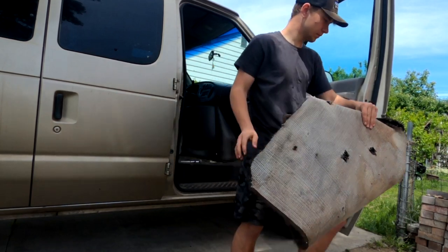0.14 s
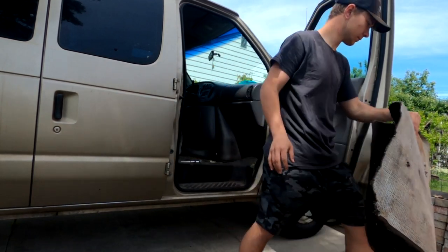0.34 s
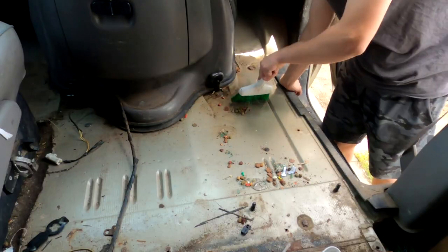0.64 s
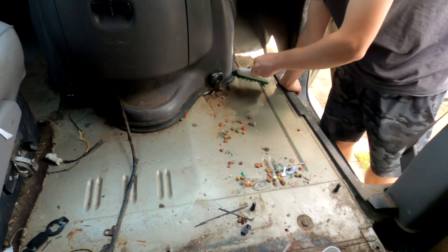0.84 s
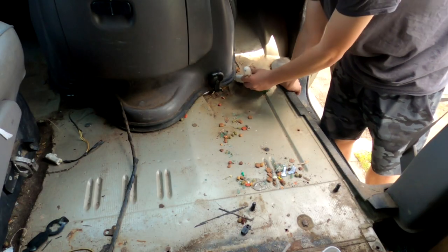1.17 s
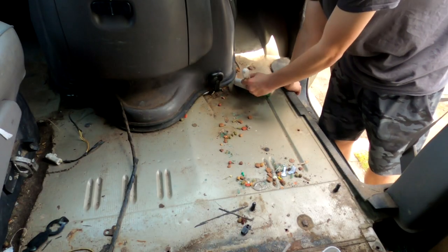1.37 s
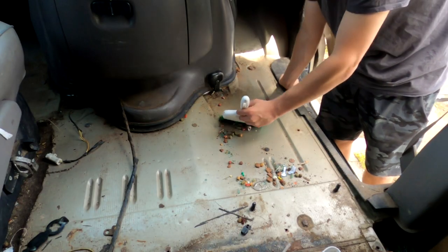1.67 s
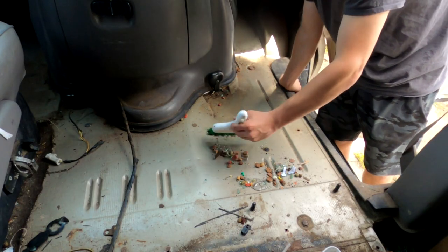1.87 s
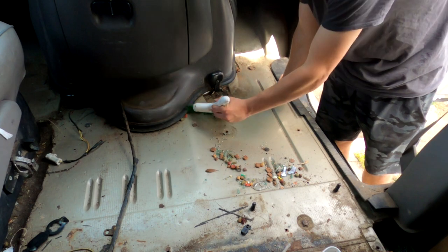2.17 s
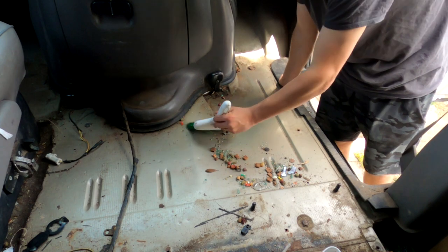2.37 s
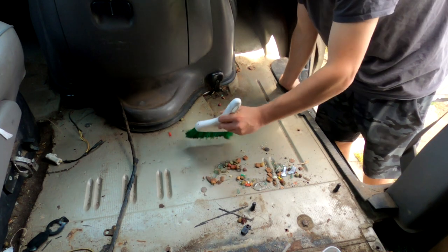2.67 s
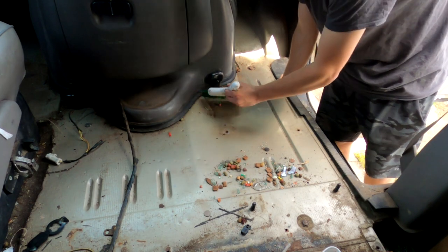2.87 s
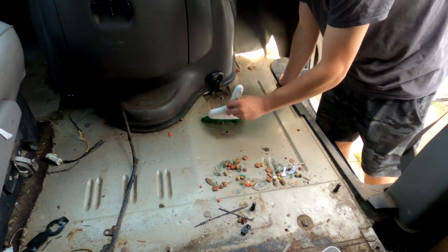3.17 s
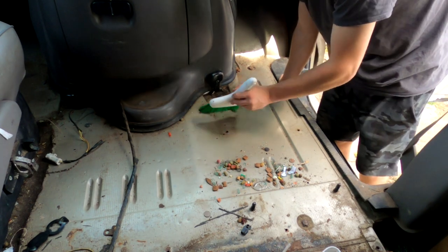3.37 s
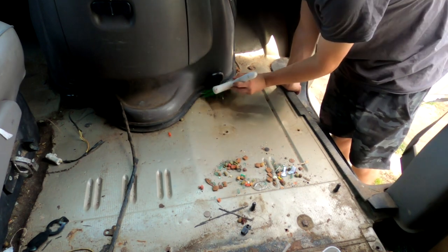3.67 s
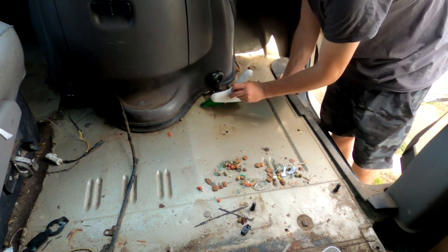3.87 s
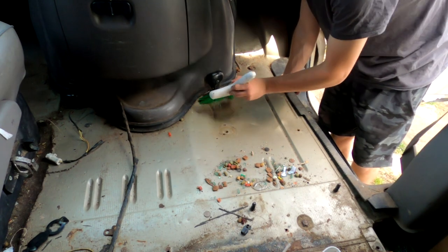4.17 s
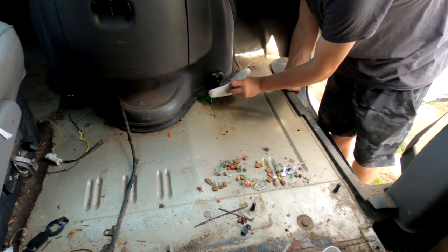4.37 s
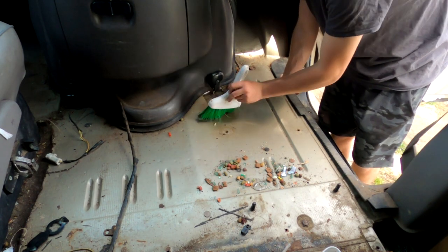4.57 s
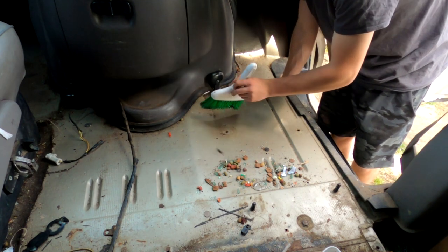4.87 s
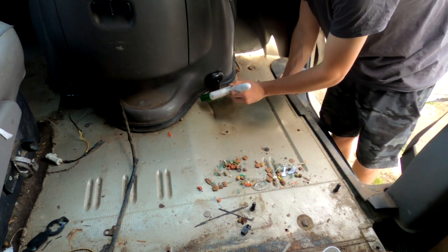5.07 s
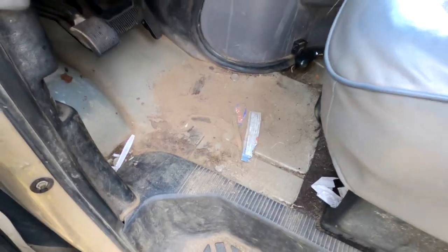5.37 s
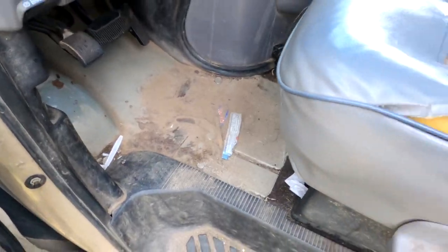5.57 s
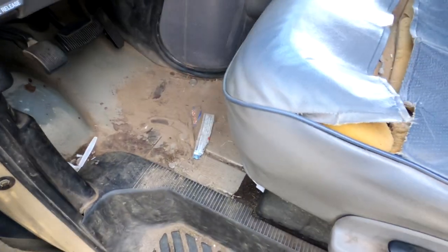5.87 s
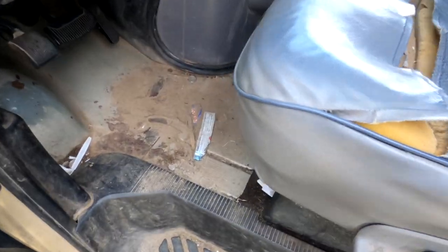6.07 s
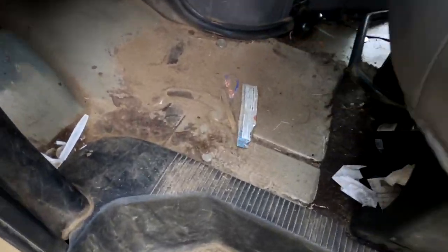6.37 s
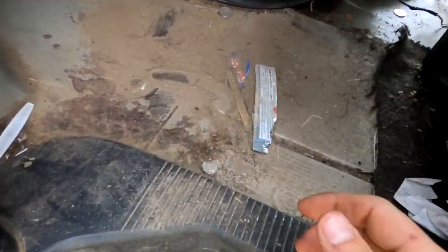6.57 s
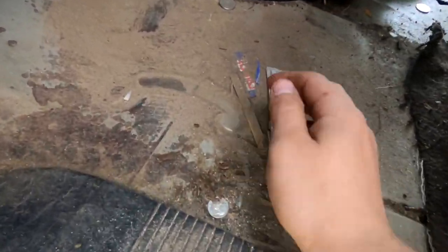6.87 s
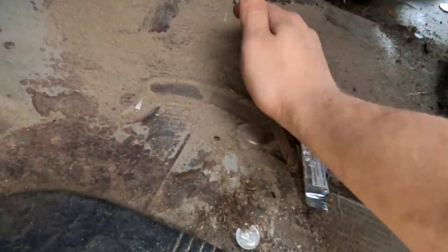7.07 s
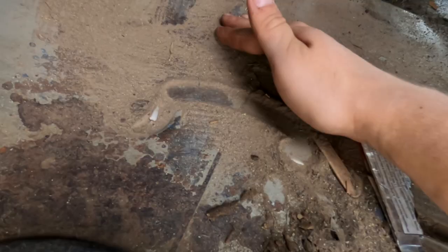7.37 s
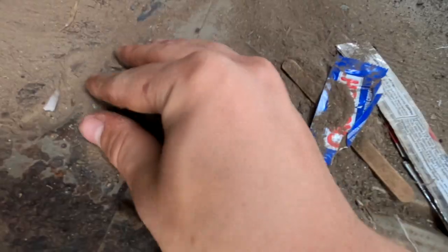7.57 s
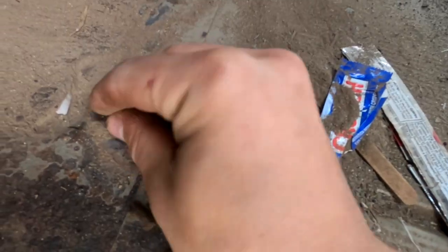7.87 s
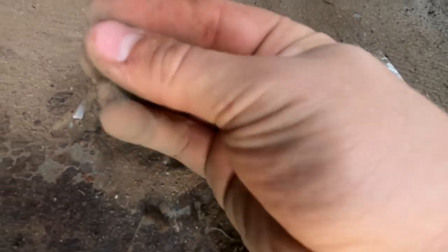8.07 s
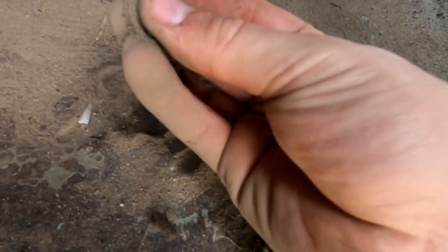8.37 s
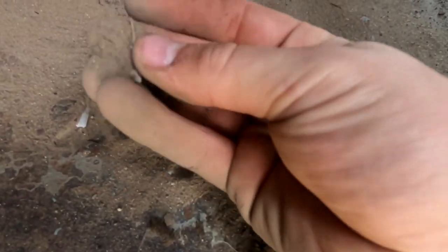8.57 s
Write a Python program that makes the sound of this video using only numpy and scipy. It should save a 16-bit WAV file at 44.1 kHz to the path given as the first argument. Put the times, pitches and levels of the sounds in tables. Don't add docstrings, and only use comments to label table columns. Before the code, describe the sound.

Half a second of open wind rumble, then close brushing inside a metal van: bright, gritty bristle strokes, pebbles skittering, a dull floor boom, the brush block tapping steel and hard trim. It cuts out briefly and wind comes back with a passing car far off and a few trim ticks. A heavy palm slap starts sandy dragging and chirping foil crinkles, ending in faint finger rubbing over low wind.

```python
import sys
import numpy as np
from scipy import signal
from scipy.fft import rfft, irfft, next_fast_len
from scipy.io import wavfile
from scipy.ndimage import map_coordinates

SR = 44100
rng = np.random.default_rng(int(sys.argv[2]) if len(sys.argv) > 2 else 0)


def waveform_to_disk(signal):
    frames = np.transpose(np.atleast_2d(signal))
    scaled = np.clip(frames, -1, 1) * 32767
    samples = np.round(scaled).astype(np.int16)
    wavfile.write(sys.argv[1], SR, samples)


def invert_db(x):
    u = np.asarray(x, float) / 20
    return 10 ** u


N = 384993
T = np.arange(N) / SR
YARD_END_S = .46


def unit(x):
    return x / np.sqrt(np.mean(x ** 2) + 1e-20)


def along(points, hz):
    f, v = np.transpose(points)
    return np.interp(np.log(hz + 1), np.log(f + 1), v)


def curves(rows):
    s, first, *rest = np.transpose(rows)
    return [np.interp(T, s, first, -200, -200)] + [np.interp(T, s, c) for c in rest]


def wobble(rate):
    return map_coordinates(rng.standard_normal(int(N * rate / SR) + 4), [T * rate])


def filtered(x, response):
    m = next_fast_len(N + SR // 2)
    return irfft(rfft(x, m) * response(np.fft.rfftfreq(m, 1 / SR)), m)[..., :N]


def noise(spectrum):
    return unit(filtered(rng.standard_normal(N), lambda f: invert_db(along(spectrum, f))))


def mode(f, hz, width):
    return 1j * f * width / (hz * hz - f * f + 1j * f * width)


def add_at(out, s, sound):
    out[round(s * SR):][:len(sound)] += sound


def touches(rows, sag=1, lift=1):
    swell_db, lift_db_per_s = 16.5, 191

    def shape(s, rise, hold, db, sag_db):
        corners = np.cumsum([-.04, .04, rise, hold, 1])
        held_db = -sag * sag_db
        levels = [-3 * swell_db, -swell_db, 0, held_db, held_db - lift * lift_db_per_s]
        return db + np.interp(T - s, corners, levels, -200, -200)

    return 10 * np.log10(sum(invert_db(2 * shape(*r)) for r in rows))


def grit(spread_db, clump_db):
    size_db = np.clip(spread_db, 0, 2) * np.minimum(rng.exponential(1, N), 4)
    size_db += np.clip(clump_db, 0, 3) * wobble(110)
    return unit(invert_db(size_db) * rng.standard_normal(N))


# f/Hz, level/dB
GUST_SPECTRUM = [(8.8, -38), (15, 7.5), (48, 1), (81, 3.5), (145, -6), (227, -12), (350, -35), (414, -30),
                 (600, -43.5), (780, -30.5), (1320, -120)]
DARK_WIND_SPECTRUM = [(8.8, -42), (15, 0), (43, 2.5), (108, 3.5), (162, -16), (253, -19), (309, -42),
                      (402, -25.5), (600, -32.5), (780, -50), (1320, -120)]
# t/s, rumble level/dB, flutter over rumble/dB
YARD_WIND = [
    (0.0, -24, -15),
    (0.07, -27, -7),
    (0.096, -21.5, -20),
    (0.112, -34.5, -13),
    (0.238, -29, -5),
    (0.294, -24, -9),
    (0.36, -34, -9),
    (0.392, -25.5, -19.5),
    (0.45, -22, -10),
]
# t/s, rumble level/dB
LAST_WIND = [
    (5.45, -20.5),
    (5.54, -25.5),
    (6.42, -26),
    (7.12, -32.5),
    (7.35, -23.5),
    (7.41, -27),
    (7.99, -26.5),
    (8.06, -31),
    (8.8, -27),
]


def wind():
    yard_db, flutter_db = curves(YARD_WIND + [(YARD_END_S, *YARD_WIND[-1][1:])])
    flutter = unit(filtered(rng.standard_normal(N), lambda f: mode(f, 210, 200) ** 3))
    flutter *= invert_db(yard_db + flutter_db - 4.5 + 4.1 * wobble(40))
    low = np.interp(T, [7.5, 7.6], [0, 1])
    rumble = (1 - low) * noise(GUST_SPECTRUM) + low * noise(DARK_WIND_SPECTRUM)
    rumble = unit(invert_db(1.8 * wobble(12)) * rumble)
    return flutter + (invert_db(yard_db + 1.3) + invert_db(curves(LAST_WIND)[0])) * rumble


# f/Hz, level/dB
TYRE_SPECTRUM = [(150, -29), (250, -3), (340, -9), (494, -12), (682, -16), (913, -8), (1440, -9),
                 (2980, -36), (7150, -43), (9570, -49), (12000, -74), (15600, -104), (22000, -120)]
# t/s, level/dB
CABIN_ROAD = [
    (.474, -47),
    (1.3, -63),
    (4.8, -68.5),
    (5.25, -74.5),
]
# t/s, level/dB
PASSING_CAR = [
    (5.45, -42),
    (5.62, -39),
    (5.9, -43.5),
    (6.2, -44),
    (6.35, -42),
    (6.55, -44),
    (7, -46),
    (7.3, -55),
    (8.8, -55),
]


def traffic():
    level = (T < YARD_END_S) * invert_db(-55.5) + invert_db(curves(CABIN_ROAD)[0]) + invert_db(curves(PASSING_CAR)[0])
    return level * invert_db(0.16 + 1.3 * wobble(14) + 1.1 * wobble(40)) * noise(TYRE_SPECTRUM)


# f/Hz, level/dB
LEAF_SPECTRUM = [(880, -34), (1500, -4), (1820, -1), (2020, -9), (2340, -5), (7830, -20), (12000, -40),
                 (15600, -70), (22000, -120)]
# t/s, level/dB
TREE_LEVEL = [
    (0, -61),
    (.46, -61),
    (.47, -72),
    (1.6, -72),
    (2, -84),
    (5.4, -90),
    (5.5, -64),
    (8.8, -63),
]


def trees():
    return invert_db(curves(TREE_LEVEL)[0]) * noise(LEAF_SPECTRUM)


# t/s, level/dB, f/Hz
MACHINE = [
    (8.1, -80, 402),
    (8.17, -57, 402),
    (8.45, -57, 399),
    (8.73, -58, 396),
]


def machine():
    s, db, hz = np.transpose(MACHINE)
    tone = np.sin(2 * np.pi * np.cumsum(np.interp(T, s, hz)) / SR)
    return invert_db(np.interp(T, s, db, -200) + 2.8 * wobble(8)) * tone


# f/Hz, level/dB
CABIN_SPECTRUM = [(8.8, -46.5), (15, 6.5), (69, -4), (108, -7.5), (141, -10.5), (427, -21.5), (483, -42.5),
                  (600, -26.5), (780, -49), (1320, -120)]
# t/s, level/dB
CABIN_LEVEL = [
    (.47, -53),
    (3.72, -49.5),
    (3.81, -44.5),
    (5.25, -53),
]


def cabin_hum():
    return invert_db(curves(CABIN_LEVEL)[0] + 1.4 * wobble(7.1)) * noise(CABIN_SPECTRUM)


# t/s, peak level/dB, f/Hz, lean/rad, ring/s
PALM_THUDS = [
    (7.3525, -7.5, 135, .6, .008),
    (7.543, -14, 90, 3.1, .006),
]


def palm_thuds():
    out = np.zeros(N)
    for s, db, hz, lean, ring in PALM_THUDS:
        u = (T - s) * hz
        swell = np.where(u < 0, np.exp(-(u / .4) ** 2), np.exp(-np.abs(T - s) / ring))
        out += invert_db(db) * np.cos(2 * np.pi * u + lean) * swell
    return out


# f/Hz, level/dB
SAND_SPECTRUM = [(290, -40), (500, 2), (781, 4.5), (1450, 12), (1770, 11), (2760, 8), (4440, 8.5),
                 (8360, 0), (15500, -21)]
PALM_SPECTRUM = [(120, -18), (220, 12.5), (500, 11.5), (900, 7.5), (1300, -2.5), (2500, -34)]
# t/s, rise/s, hold/s, level/dB, sag/dB
SAND_PUSHES = [
    (6.95, 0.18, 0.19, -52.5, -3),
    (7.335, 0.017, 0.058, -29.5, 13.5),
    (7.38, 0.064, 0.24, -25.5, -1.5),
    (7.68, 0.037, 0.14, -33, 0.5),
    (7.85, 0.017, 0.15, -43, 1),
    (8.03, 0.11, 0.057, -51.5, 14),
]
PALM_DRAGS = [
    (7.05, 0.084, 0.17, -49.5, 5.5),
    (7.335, 0.026, 0.026, -21, 29),
    (7.39, 0.065, 0.091, -19, 1),
    (7.55, 0.036, .3, -28, 4.2),
    (7.85, 0.042, 0.12, -33, 3.2),
    (8.04, 0.045, 0.06, -48, 5),
]


def hand_on_sand():
    sand = filtered(grit(spread_db=-7, clump_db=1.5), lambda f: invert_db(along(SAND_SPECTRUM, f)))
    drag = filtered(grit(spread_db=-1.0, clump_db=1.0), lambda f: invert_db(along(PALM_SPECTRUM, f)))
    sand_db, drag_db = touches(SAND_PUSHES), touches(PALM_DRAGS, lift=9.3)
    return invert_db(sand_db - 3.5) * unit(sand) + invert_db(drag_db - 8.0) * unit(drag)


# t/s, rise/s, hold/s, level/dB, sag/dB
FOIL_BENDS = [
    (7.4, 0.058, 0.09, -31.5, 3),
    (7.55, 0.032, 0.16, -33, 3.6),
    (7.72, 0.027, .13, -33, 1),
    (7.87, 0.01, 0.043, -30, 6),
    (7.95, 0.01, 0.044, -36.5, 2),
]
# t/s, peak level/dB, f/Hz, half length/s
FOIL_SLIPS = [(7.424, -25.5, 1514, 0.0067), (7.442, -23.5, 2645, .008), (7.462, -20, 1552, .01),
              (7.463, -24.5, 2680, .007), (7.501, -23.5, 1477, .008), (7.541, -27, 2130, 0.0074),
              (7.57, -26, 2720, 0.0062), (7.591, -21, 2735, .01), (7.631, -27.5, 2780, 0.012),
              (7.661, -25, 1670, 0.0072), (7.742, -22.5, 1406, .005), (7.751, -22.5, 1530, 0.0044),
              (7.778, -13.5, 1433, .009), (7.795, -17.5, 1386, 0.0061), (7.816, -23.5, 1416, .005),
              (7.829, -15, 1377, .004), (7.838, -14, 1407, 0.0043), (7.857, -22.5, 1445, .007),
              (7.912, -27.5, 1450, 0.0036), (7.955, -33, 1300, 0.0039), (7.976, -28.5, 1428, 0.0051),
              (7.999, -30, 1455, .005)]
# pitch ratio, level/dB
FOIL_FOLDS = [
    (.82, -3),
    (1, 0),
    (1.17, -6),
]


def foil():
    low_db = touches(FOIL_BENDS, lift=2.5)
    high_db = low_db - 2 - 97 * np.maximum(T - 7.6, 0)
    low = filtered(grit(spread_db=1, clump_db=2.5),
                   lambda f: (mode(f, 1480, 320) - .7 * mode(f, 1170, 220)) * mode(f, 1380, 900))
    high = filtered(grit(spread_db=1, clump_db=2.5), lambda f: mode(f, 2730, 380) * mode(f, 2900, 1300))
    out = invert_db(low_db - 5.0) * unit(low) + invert_db(high_db + 1.5) * unit(high)
    t = np.arange(-SR // 20, SR // 20) / SR
    for s, db, hz, half in FOIL_SLIPS:
        notes = 0
        for ratio, fold_db in FOIL_FOLDS:
            shiver = np.cumsum(rng.normal(0, .06, len(t)))
            notes = notes + invert_db(fold_db) * np.sin(2 * np.pi * ratio * hz * t + shiver)
        add_at(out, s - .05, invert_db(db - 5.5) * np.exp(-(t / half) ** 4) * notes)
    return out


# t/s, rise/s, hold/s, level/dB, sag/dB
FINGER_RUBS = [
    (8.2, 0.069, 0.17, -64, -7),
    (8.38, 0.15, 0.4, -51, 11.5),
]
# f/Hz, width/Hz, level/dB
HAND_HOLLOW = [(2680, 600, 1), (5300, 800, -1), (6500, 900, -7), (9000, 3000, -16)]


def finger_rub():
    def hollow(f):
        return sum(invert_db(db) * mode(f, hz, w) for hz, w, db in HAND_HOLLOW) / (1 + (f / 12000) ** 4)

    return invert_db(touches(FINGER_RUBS)) * unit(filtered(grit(spread_db=5.5, clump_db=2.0), hollow))


# (t/s, f/Hz, level/dB, t60/s)
PINGS = [(.078, 2900, -60, .05), (.096, 3000, -59, .05), (.575, 12500, -58, .12), (.6, 12900, -54, .12),
         (.602, 13500, -56, .06), (.625, 9200, -48, .08), (.642, 12950, -55, .12), (.668, 12900, -53, .15),
         (.672, 12550, -56, .08), (.7, 12850, -54, .15), (.725, 12850, -53, .25), (.8, 9590, -53, .2),
         (1.76, 12850, -54, .2), (2.61, 12850, -56, .2), (2.7, 12850, -61, .3), (2.94, 12300, -68, .2),
         (2.474, 1760, -28, .3), (2.474, 2740, -30, .3), (2.474, 4380, -30, .2), (2.552, 2050, -29, .2),
         (2.7, 1930, -33, .15), (3.186, 1060, -36, .3), (3.228, 3700, -41, .2), (3.278, 4500, -39, .15),
         (4.63, 352, -33, .22), (4.645, 340, -36, .15), (3.99, 350, -40, .3), (6.838, 3900, -40, .06)]


def pings():
    out, t = np.zeros(N), np.arange(SR // 3) / SR
    for s, hz, db, t60 in PINGS:
        shiver = np.cumsum(rng.normal(0, 0.05, len(t))) * min(hz / 5000, 1)
        decay = invert_db(db - 60 * t / t60) * (1 - np.exp(-t / 0.0033))
        add_at(out, s, decay * np.sin(2 * np.pi * hz * t + shiver))
    return out


# f/Hz, width/Hz, level/dB
PANEL_MODES = [(543, 20, -6), (811, 38, -9), (1047, 30, -4), (1202, 25, -7), (1390, 40, -4), (1759, 54, -5),
               (1900, 60, -8), (2127, 30, -8), (2270, 80, -8), (2730, 40, -5), (2950, 90, -9),
               (3500, 90, -9), (4340, 50, -6), (5593, 45, -8)]


def steel(f):
    return sum((-1) ** k * invert_db(db) * mode(f, hz, w) for k, (hz, w, db) in enumerate(PANEL_MODES))


# f/Hz, level/dB
BRISTLE_SPECTRUM = [(150, -12.5), (250, -3.5), (341, -14.5), (482, 4), (603, 10.5), (823, 5), (1160, 4.5),
                    (2660, 5.5), (4710, 1), (10800, -25), (12800, -29.5), (15500, -45)]


def blow(db, hz, edge_db, t60, rise, ring_db, on_rib=False, at_door=False):
    t = np.arange(SR // 3) / SR
    f = np.fft.rfftfreq(len(t), 1 / SR)
    body = invert_db(along(BRISTLE_SPECTRUM, f)) * (1 + 3 * steel(f) + 0.95 * mode(f, hz, 0.3 * hz))
    body *= f ** 2 / (f ** 2 + (0.42 * hz) ** 2)
    body /= 20 + (on_rib and db < -37) * (f / 4200) ** 4
    body /= 1 + at_door * (f / (3 * hz)) ** 4
    body /= 0.5 + on_rib * (f / 9000) ** 4
    edge = 1 + invert_db(edge_db + 46.5) * (f / 8000) ** 2
    spray = np.fft.irfft(rfft(rng.standard_normal(len(t))) * body * edge)
    ring = np.fft.irfft(rfft(rng.standard_normal(len(t))) * mode(f, hz, 54))
    spray_gain = invert_db(db + 4.5 - 60 * t / t60) * (1 - np.exp(-t / rise))
    ring_gain = invert_db(db + ring_db - 60 * t / 0.24) * (1 - np.exp(-t / 0.0018))
    return spray_gain * unit(spray) + ring_gain * unit(ring)


# t/s, peak level/dB, centre f/Hz
RIB_TRIPS = [(.473, -31, 1900), (0.522, -34, 1260), (0.645, -30.5, 1360), (.688, -32, 1680),
             (0.71, -24.5, 1680), (.748, -27, 1260), (.783, -28.5, 1030), (0.811, -26, 1410),
             (0.8505, -24, 1190), (0.902, -26.5, 1080), (0.929, -30, 1290), (0.979, -32, 1275),
             (1.018, -38, 1270), (1.0692, -46, 1530), (1.1115, -46, 1400), (1.175, -52, 1460),
             (1.207, -47.5, 1520), (1.235, -54.5, 3020), (1.27, -57.5, 1360), (1.29, -48.5, 1390),
             (1.335, -62, 1400), (1.79, -33, 1520), (1.808, -29, 3020), (1.849, -27.5, 1390),
             (1.909, -28.5, 1500), (1.947, -30.5, 1210), (2.02, -31.5, 1600), (2.0915, -36, 1640),
             (2.199, -49.5, 2730), (2.493, -25.5, 2750), (2.548, -20.5, 2080), (2.562, -26, 2020),
             (2.61, -33.5, 1400), (2.658, -38, 2250), (2.729, -31.5, 1990), (2.857, -34.5, 1580),
             (3.037, -34, 1040), (3.1045, -45, 1840), (3.1838, -30.5, 1120), (3.229, -30, 1430),
             (3.353, -40, 2540), (3.378, -45, 1860), (3.5948, -45, 1870), (3.6962, -50.5, 1920),
             (3.7807, -41.5, 1550), (3.851, -44, 1080), (3.902, -35.5, 1330), (3.94, -37.5, 1290),
             (4.01, -39.5, 1070), (4.06, -39, 1080), (4.28, -39, 2350), (4.317, -40, 2180),
             (4.345, -43, 3470)]
STEEL_KNOCKS = [(2.115, -28, 2700), (2.124, -30, 1300), (2.475, -26, 4150), (2.699, -31.5, 1930),
                (3.2775, -30.5, 1200), (3.185, -51.5, 3660), (3.424, -32.5, 1640), (3.4282, -39, 2200),
                (3.5024, -33.5, 1570), (4.1402, -36.5, 2870), (4.156, -32, 2460), (4.21, -38.5, 1590),
                (4.8193, -41, 2670)]
TRIM_KNOCKS = [(.855, -44, 5000), (.976, -46, 4000), (1.016, -52, 5000), (1.112, -52, 3000),
               (2.275, -54.5, 3940), (2.452, -42, 6000), (2.93, -72, 6000), (3.747, -52, 2120),
               (4.2362, -33, 2820), (4.8, -42.5, 2860), (4.8874, -42, 1520), (4.9294, -46, 2600),
               (4.9767, -51, 1970)]
# bright edge level/dB, t60/s, rise/s, ring level/dB
SURFACES = [
    (-61, 0.092, 0.0057, -7.5),
    (-52.5, 0.12, 0.00054, -15),
    (-33, 0.13, 0.00059, -21.5),
]
# t/s, peak level/dB, centre f/Hz, edge level/dB, t60/s
DOOR_CREAKS = [
    (6.137, -39, 2100, -45, .09),
    (6.262, -44, 1700, -45, .12),
    (6.336, -41, 2600, -38, .09),
    (6.697, -46, 2900, -45, .05),
    (6.839, -46, 3900, -42, .05),
]


def taps():
    out = np.zeros(N)
    for rows, surface in zip((RIB_TRIPS, STEEL_KNOCKS, TRIM_KNOCKS), SURFACES):
        for s, db, hz in rows:
            add_at(out, s, blow(db, hz, *surface, on_rib=rows is RIB_TRIPS))
    for s, db, hz, edge_db, t60 in DOOR_CREAKS:
        add_at(out, s, blow(db, hz, edge_db, t60, rise=.0015, ring_db=-40, at_door=True))
    return out


def pebbles(per_second, centre_hz, t60):
    draw, t = rng.random((int(per_second * 5), 4)), np.arange(SR // 30) / SR
    start = ((draw[:, 0] * 5 + .4) * SR).astype(int)
    size = -np.log(draw[:, 1:2] + 0.046)
    hz = centre_hz * np.exp(1.1 * (draw[:, 2:3] + draw[:, 3:4] - 1))
    notes = size * np.sin(2 * np.pi * hz * t) * invert_db(-60 * t / t60)
    notes *= centre_hz / (hz + centre_hz)
    place = start[:, None] + np.arange(len(t))
    return unit(np.bincount(place.ravel(), notes.ravel(), N)[:N])


# t/s, rise/s, hold/s, level/dB, sag/dB
STROKES = [(0.455, 0.005, 0.2, -33, -2), (0.696, .02, 0.24, -30.5, 5), (0.95, 0.017, 0.9, -50.5, 16),
           (1.734, 0.015, 0.04, -35.5, -6), (1.758, 0.059, 0.3, -26.5, 13),
           (2.245, 0.049, 0.023, -45.5, 10), (2.465, 0.013, 0.049, -27.5, 4.5),
           (2.482, 0.043, .34, -31.5, 6.5), (2.86, 0.014, 0.11, -46, 2), (3.022, 0.017, 0.07, -45.5, 5),
           (3.103, 0.16, 0.045, -34, 4), (3.334, 0.034, 0.01, -50.5, 12.5), (3.574, 0.015, 0.045, -47, 2),
           (3.713, 0.086, 0.055, -44, 4.5), (3.879, 0.078, 0.1, -36, 4.5),
           (4.146, 0.035, 0.23, -47.5, -1.5), (4.467, 0.095, 0.11, -41, -4.5),
           (4.793, 0.022, 0.17, -48.5, 8.5)]
SKIMS = [
    (1.455, 0.0077, 0.16, -53.5, -3.5),
    (2.299, 0.083, 0.076, -52.5, -6.5),
]
PRESSES = [
    (.5, 0.14, 0.37, -36.5, 1),
    (.97, 0.034, 0.37, -48.5, 12),
    (1.72, 0.092, 0.25, -33, 6.5),
    (2.26, 0.042, 0.026, -45, 5.5),
    (2.55, 0.068, 0.45, -52, -10.5),
    (3.05, 0.13, 0.056, -44.5, -6),
    (3.75, 0.24, 0.11, -40.5, 12.5),
    (4.2, 0.078, 0.15, -59, 10.5),
    (4.5, 0.13, 0.054, -47.5, 15),
]
# t/s, f/Hz
HEAD_HOLLOW = [(0.48, 1730), (0.57, 1290), (1.66, 1384), (1.68, 1520), (2.41, 1300), (2.53, 1736),
               (2.73, 1664), (2.77, 1220), (2.86, 1657), (3.07, 1075), (3.14, 1480), (3.19, 1127),
               (3.4, 1640), (3.68, 1690), (4.07, 1194), (4.13, 1660), (4.94, 1526), (5.0, 1915)]


def brush_scratch(stroke_db, boom_db):
    contacts = grit(spread_db=5.5, clump_db=0.3)
    scratch = unit(filtered(contacts, lambda f: invert_db(along(BRISTLE_SPECTRUM, f))
                            / np.sqrt(1 + (f / 7000) ** 8) * (1 + 0.24 * steel(f))))
    hollow_hz = np.interp(T, *np.transpose(HEAD_HOLLOW))
    for hz in 1080, 1320, 1600, 1950:
        nearness = np.exp(-(np.log(hollow_hz / hz) / 0.2) ** 2)
        scratch += 0.21 * nearness * unit(filtered(contacts, lambda f: mode(f, hz, 0.2 * hz) ** 2))
    scratch += 0.65 * pebbles(per_second=800, centre_hz=2188, t60=0.07)
    only_strokes_db = touches(STROKES)
    dull = np.clip(.04 * (-35 - only_strokes_db), 0, .9) * (stroke_db - only_strokes_db < 3)
    scratch -= dull * filtered(scratch, lambda f: 1 / (1 + (2800 / (f + 1)) ** 4))
    thin = np.clip(.04 * (stroke_db - boom_db - 2.5), 0, .8)
    scratch -= thin * filtered(scratch, lambda f: 1 / (1 + (f / 800) ** 6))
    return invert_db(stroke_db - 3.0) * unit(scratch)


def floor_boom(boom_db):
    boom = filtered(grit(spread_db=1, clump_db=2.5), lambda f: mode(f, 352, 30)
                    + .25 * mode(f, 430, 300) ** 2 + .3 * mode(f, 190, 40))
    return invert_db(boom_db - 6.0) * unit(boom)


def fine_dust():
    spent = [(s, rise, hold, db, sag + 2.5 * hold) for s, rise, hold, db, sag in STROKES]
    gain = invert_db(-17 + touches(spent, sag=1.58, lift=.9)) + invert_db(-8.5 + touches(SKIMS))
    dust = filtered(grit(spread_db=7.5, clump_db=2.3), lambda f: invert_db(along(BRISTLE_SPECTRUM, f))
                    * (f / 7000) ** 4 / np.sqrt(1 + (f / 7000) ** 8))
    return gain * invert_db(4.5) * unit(dust)


def brush():
    stroke_db, boom_db = touches(STROKES + SKIMS), touches(PRESSES)
    return brush_scratch(stroke_db, boom_db) + floor_boom(boom_db) + fine_dust()


# f/Hz, side minus mid level/dB
SIDE_LEVEL = [(60, -27), (150, -22), (380, -17), (950, -12), (2380, -8), (5980, -3), (15000, 0.5)]


def spread(x):
    scatter = np.exp(2j * np.pi * wobble(30))

    def side(f):
        reflections = invert_db(along(SIDE_LEVEL, f)) * np.interp(f, T * SR / 2 / T[-1], scatter)
        lag = .8j * np.sin(np.pi * f * 2e-5)
        return reflections - lag - .16 * f ** 2 / (f ** 2 + 6000 ** 2)

    return x, filtered(x, side)


def scene():
    air = wind() + traffic() + trees() + machine() + cabin_hum()
    hand = palm_thuds() + hand_on_sand() + foil() + finger_rub()
    mid, side = spread(air + hand + pings() + taps() + brush())
    return np.array([mid + side, mid - side])


def band_limit(x):
    return signal.sosfilt(signal.butter(12, 15730, fs=SR, output="sos"), x)


def record(dry):
    mid, side = (dry[0] + dry[1]) / 2, (dry[0] - dry[1]) / 2
    stereo = ((T > .46) & (T < 5.35)) | (T > 7.545)
    side = np.where(stereo, side, filtered(side, lambda f: f > 11000))
    gate_db = np.interp(T, [0, .449, .456, .4725, .474, 5.245, 5.255, 5.45, 5.49, 5.54],
                        [0, 0, -28, -28, 0, 0, -45, -60, -9, 0])
    mix = np.array([mid + side, mid - side]) * invert_db(gate_db)
    return band_limit(mix)


dry = scene()
out = record(dry)
waveform_to_disk(out)
```